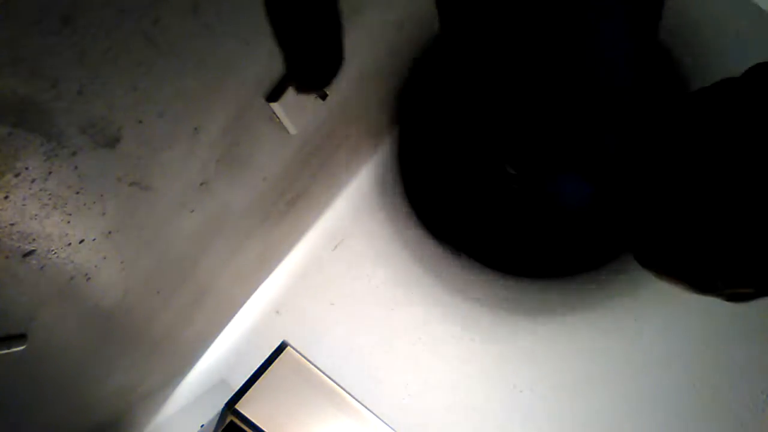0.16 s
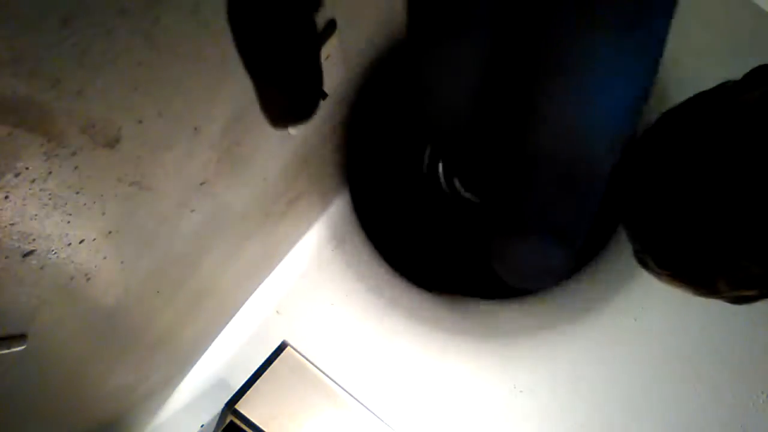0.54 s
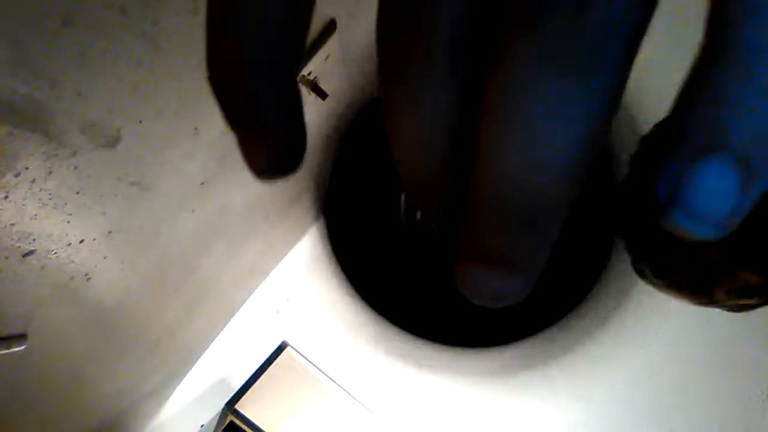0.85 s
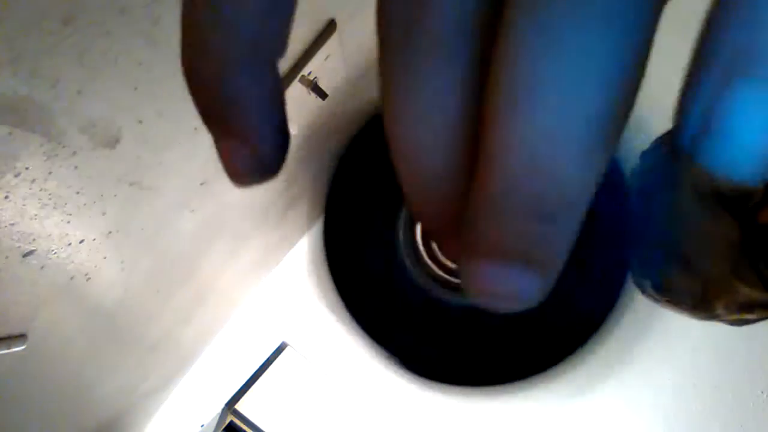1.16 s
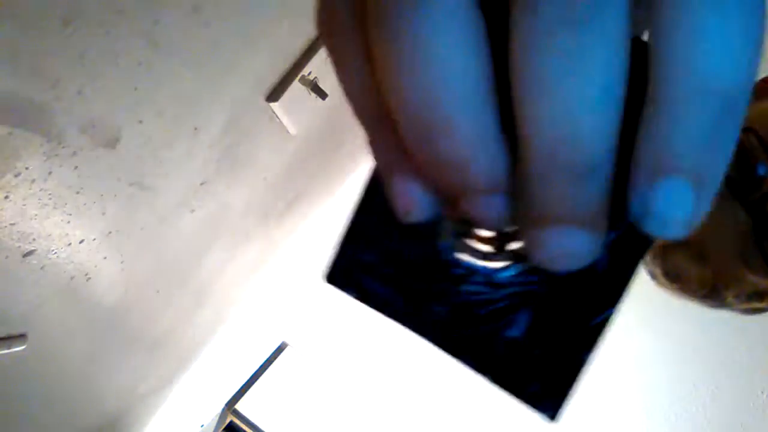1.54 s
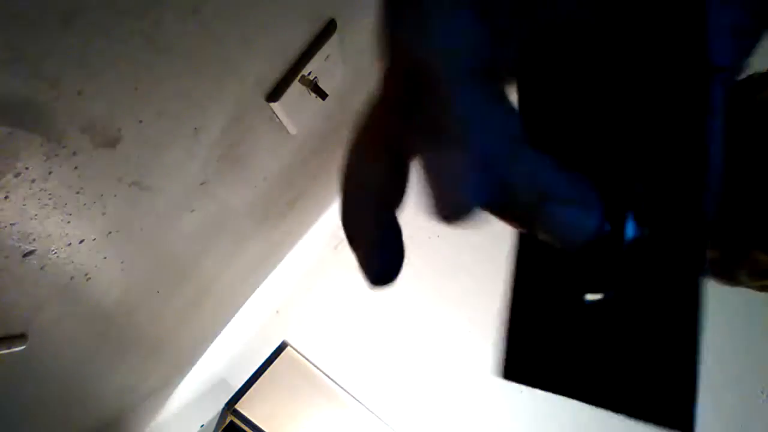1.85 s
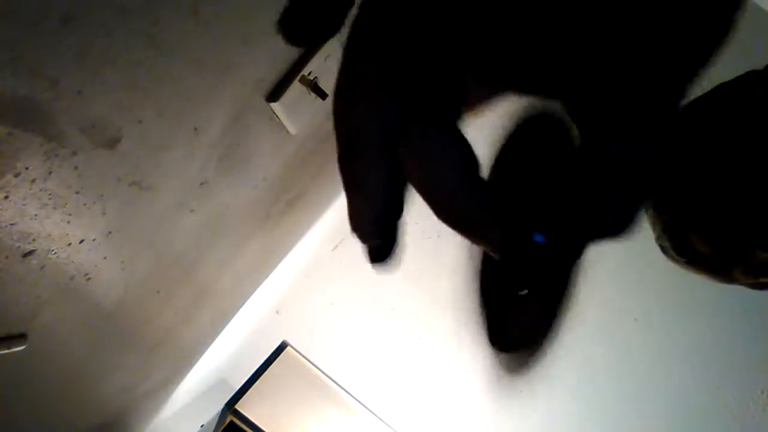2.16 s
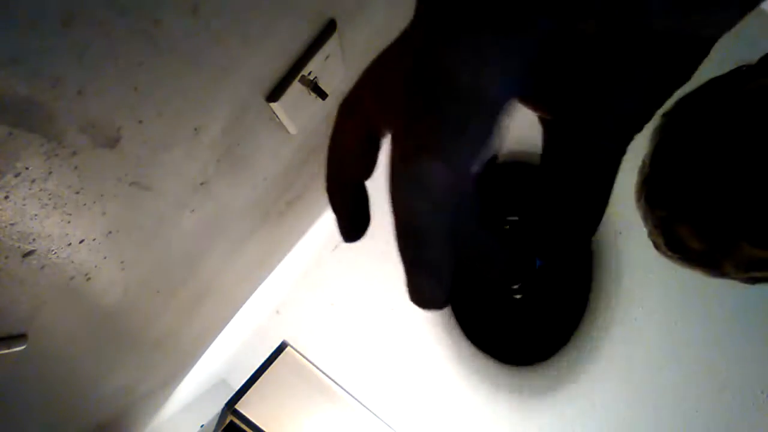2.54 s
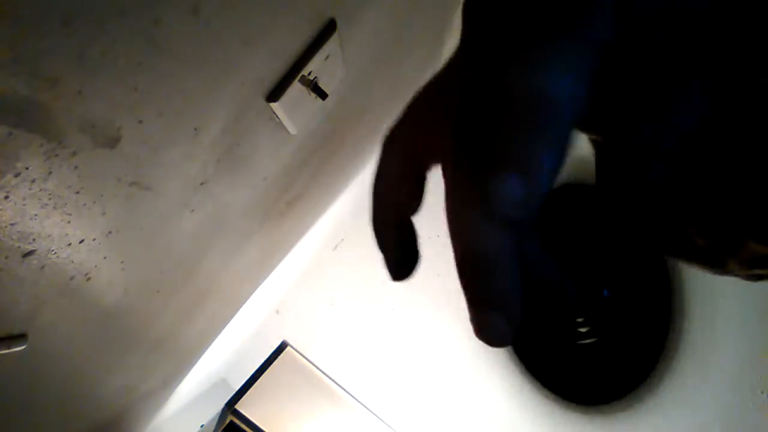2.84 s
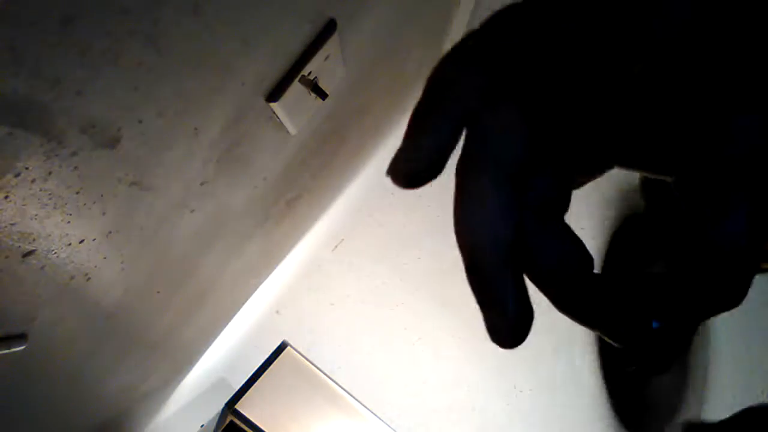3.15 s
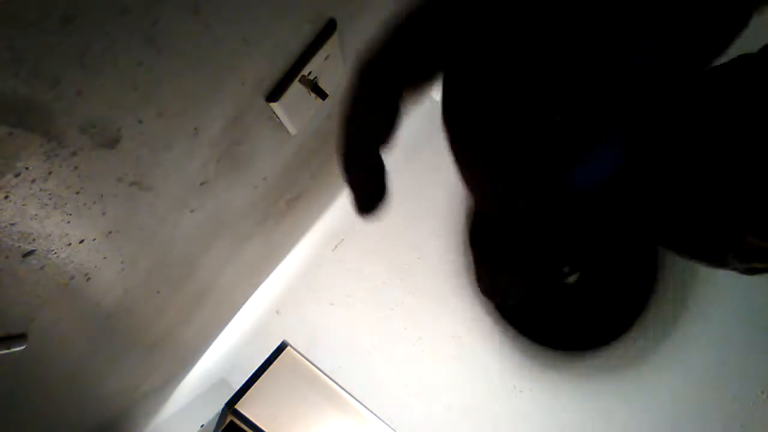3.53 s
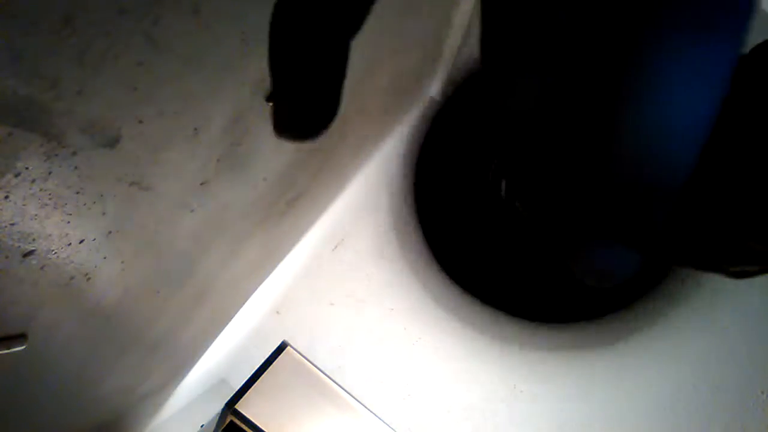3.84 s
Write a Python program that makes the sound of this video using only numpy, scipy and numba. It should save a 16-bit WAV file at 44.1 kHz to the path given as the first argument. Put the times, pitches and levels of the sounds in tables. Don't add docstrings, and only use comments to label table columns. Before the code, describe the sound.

A handheld spinner's hissy metallic whir pulses rapidly, stops abruptly for a quiet gap with soft rustle and taps, then spins again after flicks, with small rattles; close stereo phone microphone, faint indoor room tone.

```python
import sys
import numpy as np
from scipy import signal
from scipy.fft import rfft, irfft
from scipy.io import wavfile
from scipy.ndimage import uniform_filter1d
from numba import njit

SR = 44100
rng = np.random.default_rng(int(sys.argv[2]) if len(sys.argv) > 2 else 0)


def generate_wav(signal):
    frames = np.transpose(np.atleast_2d(signal))
    scaled = np.clip(frames, -1, 1) * 32767
    pcm = np.round(scaled).astype(np.int16)
    wavfile.write(sys.argv[1], SR, pcm)


def nominal_scale(level):
    x = np.asarray(level, float) / 20
    return 10 ** x


N = 176400

# flick t/s, first swell t/s, rate/(turns/s), slowing/(turns/s2)
SPIN_RUNS = [
    (0.0, .048, 16.4, 3.14),
    (2.163, 2.2, 15.0, 3.0),
    (2.48, 2.546, 16.9, 6.4),
    (3.337, 3.421, 16.3, .5),
]
# t/s, bearing level/dB, wobble depth/dB, card grip/dB, facing right/dB, cage openness/dB
HOLDING = [(0.0, -50.5, 0.5, -8, 9.5, 1), (0.151, -52, 3, 2, 10.5, 0), (.6, -52.5, 2.5, 1.5, 10, -2.5),
           (0.998, -52.5, 4, 2.5, 9, -0.5), (1.25, -53.5, 4.5, 3, 9, 0.5), (1.48, -53, 0.5, 5.5, 10, 4),
           (2.17, -52, 4, -14, 7, 7), (2.42, -54.5, 2, -16, 9.5, 6.5), (2.56, -51, 3.5, -12, 8.5, -3),
           (2.8, -52.5, 7.5, -6.5, 8.5, -2), (3.08, -50, 11.5, -20, 6.5, -7),
           (3.17, -53, 4.5, -39, 6.5, -5), (3.32, -52.5, 2, -17, 7.5, -11), (3.4, -52, 5.5, -17, 8.5, -3.5),
           (3.56, -54, 5.5, -11, 11, -0.5), (3.719, -53, 6, -4, 10.5, 1.5), (3.879, -53, 3, 3, 10.5, 1),
           (4.0, -53, 3.5, -1, 10, 0)]
# f/Hz, width/Hz, level/dB, left minus right/dB, share of wobble, gain per facing/(dB/dB)
RACE_MODES = [(6000, 1140, -2.5, -3, 1.37, 1.22), (5320, 830, -7, 17.5, 0.22, .5),
              (7800, 680, -17, 22, 0.37, 3), (10435, 1720, -8.5, 15, 0.27, 1.32),
              (15100, 6800, -16.5, 13, 0.22, 1), (4333, 340, -5.5, 14.5, 0.33, -0.5),
              (3290, 470, -6, 5.5, 0.84, 0.52), (446, 104, -29.5, -13, 0.3, -4.1)]
CAGE_MODES = [(2543, 266, -6.5, 2.3, 0.71, 0.18), (3168, 290, -15.5, 1.9, 0.42, 0.052),
              (2331, 155, -16, 2.3, 0.2, 0.083)]
CARD_MODES = [(900, 85, -13.5, 0.43, 0.12, 0.13), (971, 22, -29.5, 1.3, 0.7, 0.11),
              (1340.5, 36, -26.5, 1.5, 0.39, 0.27), (1722, 160, -18, 10.6, 0.31, 0.19),
              (4974, 630, -2.5, 1.7, 1, 0.16), (397, 240, -24, 0.85, 0.22, 0.076),
              (1997.4, 340, -18.5, 2, .3, .1)]
# t/s, f/Hz
HAND_CAVITY = [(0, 6000), (.6, 6030), (1.2, 5970), (1.49, 5620), (2.17, 5860), (2.45, 6000), (2.9, 6000),
               (3.1, 5920), (3.18, 5400), (3.27, 4400), (3.32, 5830), (3.4, 6200), (3.6, 6140),
               (3.75, 6200), (4.0, 5980)]
STOP_S, STOP_FADE_S, START_S = 1.496, 0.0075, 2.163
TICKS_PER_S, TICK_SPREAD_DB = 9000, 1.6
SWELL_SHARPNESS, TURN_SCATTER_DB, FLICKER_DB = 0.5, 0.15, 0.7
SWEEP_S_PER_KHZ = 0.0063
TURN_GLIDE, PITCH_DRIFT = 0.029, 0.013
LEFT_WOBBLE, LEFT_LAG_S, LOW_LAG_S = 0.3, 0.0001545, 0.00036
SMALL_HZ = 2010
BRUSH_S, BRUSH_WIDTH_S, BRUSH_DB = 1.64, 0.021, -59.5

# t/s, level/dB, contact time/s, left minus right/dB
FRAME_FLICKS = [
    (1.494, -42.5, 0.00068, -16),
    (1.503, -60, 0.0009, -8),
    (2.163, -35, 0.0013, -8),
    (2.478, -36.5, 0.0018, -13.5),
    (2.4925, -35.5, 0.0011, -8),
    (3.336, -30, 0.0012, 5),
    (3.342, -45, 0.0013, 21),
    (3.35, -44, 0.00061, -21),
]
NAIL_SNAPS = [
    (1.4935, -34.5, 0.00053, -1),
    (1.5015, -46, 0.00053, 10),
    (2.1632, -38, 0.00044, 3),
    (2.4815, -44, .0005, 2),
    (2.492, -46, 0.00076, 0),
    (3.3365, -43, 0.0007, 12),
    (3.3425, -43, .0008, -6),
    (3.3505, -41, .0006, -3),
    (3.362, -43, 0.00054, 4),
]
CARD_EDGE_HITS = [
    (2.163, -36.5, 0.00086, -11),
    (2.478, -43, 0.00087, -2),
    (3.336, -46, 0.00089, -1),
]
BALL_RATTLES = [
    (.114, -42, 0.00053, -2),
    (2.545, -42, 0.00044, -6),
    (3.065, -53, .0005, 7),
    (3.409, -43, .0003, 0),
    (3.4165, -37.5, 0.00071, -6),
    (3.527, -35, 0.00064, 6),
]
PAD_TAPS = [
    (1.489, -47.5, 0.00028, -2.5),
    (1.611, -38.5, 0.00025, -2.5),
    (1.778, -60, 0.00051, .1),
    (2.12, -58, 0.0013, .1),
    (2.27, -59.5, 0.00038, .1),
]
TABLE_KNOCKS = [
    (1.066, -30.5, 0.00013, 2.5),
    (1.075, -48, 0.000091, -3),
    (1.097, -40.5, 0.00018, -5),
]
# f/Hz, level/dB, t60/s
FRAME_MODES = [(149.5, -17, 0.3), (328, -19, 0.07), (549, -7.5, 0.095), (740, -7, 0.054), (1072, 4, 0.01),
               (1620, -24, 0.0064), (2106, -4, 0.03), (2800, 11, 0.018), (3280, 7.5, 0.016),
               (4660, 4, 0.004), (5730, 13, 0.0047), (8000, 14, 0.0006), (10880, 7, 0.0051),
               (13500, -1.5, 0.0077)]
NAIL_MODES = [(4500, -1, .003), (6200, -1, 0.0043), (8950, 11, 0.0029), (10600, -2, .003),
              (12400, -1.5, 0.004), (14700, -9, 0.0022)]
EDGE_MODES = [(623, -10, 0.042), (1700, 1, 0.025), (2620, 7, .025), (3010, 10, 0.017)]
BALL_MODES = [(3400, -3, .006), (5700, -11, 0.0069), (6430, 11.5, 0.014), (10800, 1, 0.0053)]
PAD_MODES = [(304, -8.5, 0.14), (414, 6.5, 0.034), (607, -9, 0.031), (880, 3.5, 0.023)]
TABLE_MODES = [(240, -25, 0.064), (308, 2, 0.1), (347, -0.5, 0.088), (443, 5, 0.052), (537, 5, 0.032),
               (660, 3, 0.03), (770, 0, 0.015), (1030, 11, 0.026), (1256, -2, 0.025), (1510, 4, 0.026),
               (1660, 3, 0.019), (1970, 10, 0.019), (2260, 10, 0.025)]
# start t/s, length/s, f/Hz, level/dB
CARD_SONGS = [
    (3.165, .08, 288.5, -66.5),
    (3.75, 0.11, 478, -62.5),
    (3.957, 0.084, 471, -61),
]
RUB_HISS_DB, RUB_BODY_DB, RUB_BODY_HZ, RUB_HOLD_S, RUB_FADE_DB_S = -68.5, -67.5, 460, 0.17, 52
ROOM_T60_S, ROOM_TREBLE_T60_S, ROOM_DB = 0.43, 0.35, -12
# f/Hz, level/(dB per Hz)
AIR_SPECTRUM = [(30, -20), (55, -11.5), (150, -10.5), (540, -17), (760, -31), (1200, -25.5), (9000, -39),
                (14500, -37.5)]
AIR_DB = -70
# f/Hz, level/dB, width/Hz
HUM_LINES = [(59, -80, 3), (119, -82, 4), (146, -76, 16)]
SIDE = np.array([[0.5], [-0.5]])


def turn_count(t):
    turns = np.zeros(N)
    for flick, first, rate, slowing in SPIN_RUNS:
        since = t - first
        angle = rate * since - slowing * since ** 2 / 2
        turns = np.where(t >= flick, np.maximum(angle, -0.5), turns)
    return turns


def ball_ticks():
    struck = rng.random((3, N)) < TICKS_PER_S / SR
    sign = np.sign(rng.standard_normal((3, N)))
    ticks = struck * sign * nominal_scale(TICK_SPREAD_DB * rng.exponential(size=(3, N)))
    return level(ticks[0] + ticks[1:], 0)


def spinner(t):
    hold = np.array(HOLDING).T
    db, depth, grip, facing, cage = (np.interp(t, hold[0], c) for c in hold[1:])
    turns = turn_count(t)
    swell = np.exp(SWELL_SHARPNESS * (np.cos(2 * np.pi * turns) - 1))
    swell = depth * 2 * (swell - swell.mean()) + TURN_SCATTER_DB * walk(20)
    rise = TURN_GLIDE * np.sin(2 * np.pi * turns)
    cavity = np.interp(t, *np.array(HAND_CAVITY).T) / HAND_CAVITY[0][1]

    ticks = ball_ticks()
    card_drive = np.array([np.interp(t - LOW_LAG_S, t, ticks[0]), ticks[1]])
    steel_drive = high_pass(ticks, 4, SMALL_HZ)

    out = 0
    for modes, gain_db in ((RACE_MODES, 0 * t), (CAGE_MODES, cage), (CARD_MODES, grip)):
        for hz, width, mode_db, pan_db, share, turn in modes:
            bend = cavity if hz == RACE_MODES[0][0] else np.ones(N)
            drive = card_drive
            if hz > 2000:
                bend = bend * (1 + rise + PITCH_DRIFT * walk(12))
                drive = steel_drive
            centre = np.minimum(hz * bend, 0.45 * SR)
            ring = glide(drive, np.tan(np.pi * centre / SR), 2.0 * width / hz)
            ring = ring * np.sqrt(SR / 2 / width)
            swept = np.interp(t + SWEEP_S_PER_KHZ * (hz / 1000 - 6), t, swell)
            wobble = share * swept * np.array([[LEFT_WOBBLE], [1]]) + FLICKER_DB * walk(60)
            aim = turn * (facing - 7.0) + SIDE * (pan_db - facing)
            out = out + ring * nominal_scale(mode_db + gain_db + wobble + aim)

    stopping = np.exp(np.minimum(STOP_S - t, 0) / STOP_FADE_S)
    restart = (t - START_S) / 0.001 * (t > START_S)
    running = np.clip(stopping + restart, 0, 1)
    brush = nominal_scale(BRUSH_DB) * np.exp(-((t - BRUSH_S) / BRUSH_WIDTH_S) ** 2)
    return out * (nominal_scale(db) * running + brush)


@njit
def glide(x, g, k):
    y, b, l = np.empty_like(x), np.zeros((2, 3)), np.zeros((2, 3))
    for i in range(x.shape[1]):
        a = 1 / (1 + g[i] * (g[i] + k))
        for c in range(2):
            u = x[c, i]
            for s in range(3):
                v = (b[c, s] + g[i] * (u - l[c, s])) * a
                b[c, s], l[c, s], u = 2 * v - b[c, s], l[c, s] + 2 * g[i] * v, k * v
            y[c, i] = u
    return y


def hits(events, modes, rough, tail_db, tail_s, low_hz):
    out, tt = np.zeros((2, N)), np.arange(SR // 2) / SR
    ts = tt[:4096]
    hz, mode_db, t60 = np.array(modes).T[:, :, None]
    for s, db, contact, pan_db in events:
        strength, detune = rng.standard_normal((2, len(modes), 1))
        grit, scrape_noise = rng.standard_normal((2, 4096))
        decay = nominal_scale(mode_db + 2 * strength) * np.exp(-np.log(1000) * tt / t60)
        ring = np.sum(decay * np.sin(2 * np.pi * hz * (1 + 0.02 * detune) * tt), axis=0)
        push = ts / contact * np.exp(-ts / contact)
        tail = scrape_noise * np.exp(-ts / tail_s)
        soft_scrape = signal.fftconvolve(tail, push)[:4096] * nominal_scale(tail_db)
        force = push * (1 - rough + rough * grit)
        force = force + (1 - rough) * soft_scrape + rough * nominal_scale(tail_db) * tail
        y = signal.fftconvolve(ring, force)
        i = int(s * SR)
        y = y[:N - i] / np.abs(y).max()
        out[:, i:i + len(y)] += y * nominal_scale(db + 4.5 + SIDE * pan_db)
    return high_pass(out, 2, low_hz)


def flicks():
    frame = hits(FRAME_FLICKS, FRAME_MODES, rough=0.99, tail_db=-22.5, tail_s=0.028, low_hz=96)
    nail = hits(NAIL_SNAPS, NAIL_MODES, rough=0.78, tail_db=-15, tail_s=0.0075, low_hz=2480)
    edge = hits(CARD_EDGE_HITS, EDGE_MODES, rough=1.0, tail_db=-24, tail_s=0.014, low_hz=300)
    return frame + nail + edge


def ball_rattles():
    return hits(BALL_RATTLES, BALL_MODES, rough=0.98, tail_db=-26, tail_s=0.012, low_hz=2000)


def card_hums(t):
    out = 0
    for s, length, hz, db in CARD_SONGS:
        attack = np.clip((t - s) / 0.012, 0, 1)
        decay = np.exp(-np.maximum(t - s - length / 2, 0) / (length / 2))
        out = out + nominal_scale(db + 1.5) * np.sin(2 * np.pi * hz * t) * attack * decay
    return out


def fingers(t):
    fade = (t > STOP_S) * nominal_scale(-RUB_FADE_DB_S * np.maximum(t - STOP_S - RUB_HOLD_S, 0))
    noise = rng.standard_normal((2, 2, N))
    hiss = level(band(noise[0], 2500, 11300), RUB_HISS_DB) * nominal_scale(0.7 * walk(17))
    shared = noise[1, 0] + 0.5 * noise[1]
    body = band(band(shared, RUB_BODY_HZ, 450), RUB_BODY_HZ, 450)
    return fade * (hiss + level(body, RUB_BODY_DB) * nominal_scale(2.5 * walk(25)))


def finger_taps():
    return hits(PAD_TAPS, PAD_MODES, rough=0.088, tail_db=-31.0, tail_s=0.016, low_hz=228)


def table_knocks():
    return hits(TABLE_KNOCKS, TABLE_MODES, rough=0.098, tail_db=-20, tail_s=0.032, low_hz=239)


def reverberation(near, t):
    tt = t[:SR]
    noise = rng.standard_normal((2, SR))
    low = signal.lfilter(*signal.butter(1, 1200, fs=SR), noise)
    bass = low * nominal_scale(-60 * tt / ROOM_T60_S) * 1.65
    treble = (noise - low) * nominal_scale(-60 * tt / ROOM_TREBLE_T60_S)
    echo = (bass + treble) * (tt > 0.004)
    echo = echo / np.sqrt(np.sum(echo ** 2) / 2)
    return nominal_scale(ROOM_DB) * signal.fftconvolve(near.mean(axis=0)[None], echo, axes=1)[:, :N]


def room_tone():
    f = np.arange(N // 2 + 1) * SR / N + 1e-3
    hz, db = np.array(AIR_SPECTRUM).T
    colour = nominal_scale(np.interp(np.log(f), np.log(hz), db))
    spread = [f ** 0, np.clip(f / 900, 0.35, 1)]
    mid, side = irfft(rfft(rng.standard_normal((2, N))) * colour * spread, N)
    out = level(np.array([mid + side, mid - side]), AIR_DB) * nominal_scale(0.19 * walk(4.93))
    for hz, db, width in HUM_LINES:
        out = out + level(band(band(rng.standard_normal(N), hz, width), hz, width), db)
    return out


def level(x, db):
    return x * nominal_scale(db) / np.sqrt(np.mean(x ** 2))


def band(x, hz, width):
    return signal.lfilter(*signal.iirpeak(min(hz, 0.45 * SR), hz / width, fs=SR), x)


def high_pass(x, order, hz):
    return signal.sosfilt(signal.butter(order, hz, "high", fs=SR, output="sos"), x)


def walk(rate):
    k = int(SR / rate)
    steps = np.repeat(rng.standard_normal(N // k + 1), k)
    return 2.18 * uniform_filter1d(uniform_filter1d(steps, k), k)[:N]


def scene():
    t = np.arange(N) / SR
    near = spinner(t) + flicks() + ball_rattles() + card_hums(t)
    near = near + fingers(t) + finger_taps() + table_knocks()
    near = np.array([np.interp(t - LEFT_LAG_S, t, near[0]), near[1]])
    return near + reverberation(near, t) + room_tone()


def low_pass(x):
    return signal.sosfilt(signal.butter(12, 16000, fs=SR, output="sos"), x)


def record(dry):
    x = high_pass(dry, 2, 45)
    x = signal.sosfilt(signal.butter(8, 15900, fs=SR, output="sos"), x)
    return low_pass(x)


dry = scene()
out = record(dry)
generate_wav(out)
```